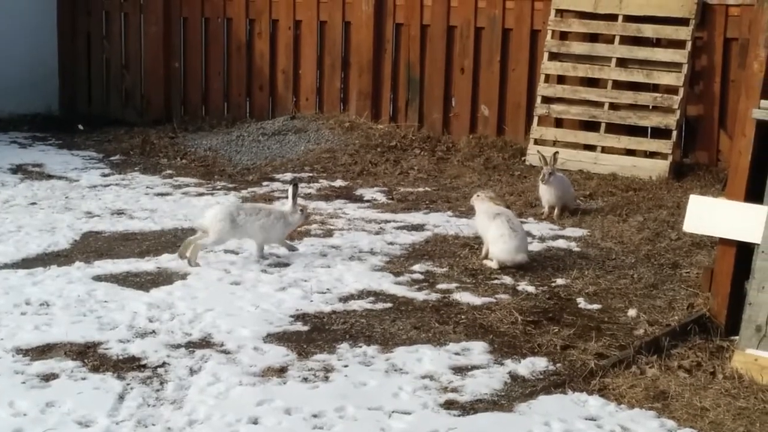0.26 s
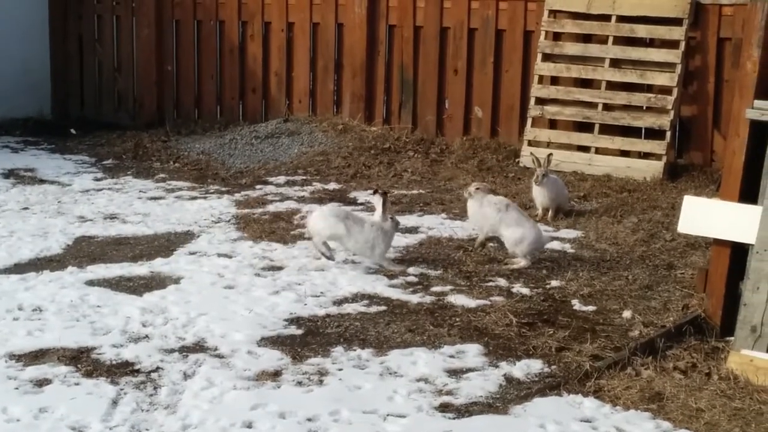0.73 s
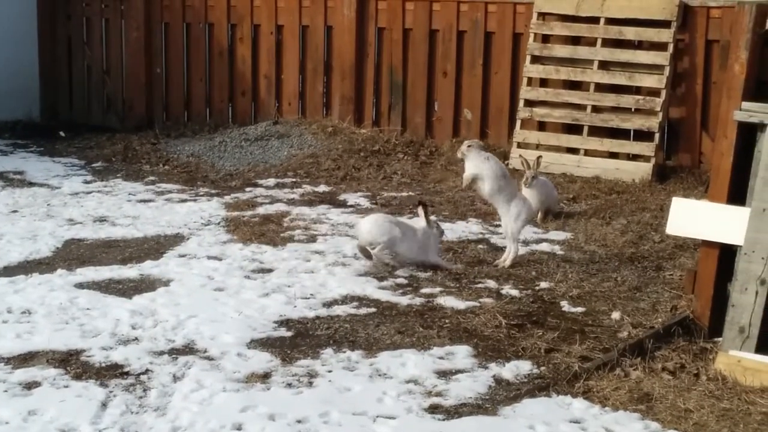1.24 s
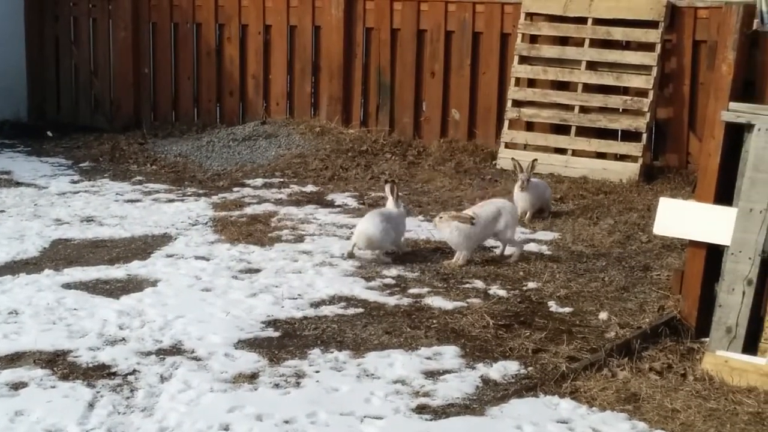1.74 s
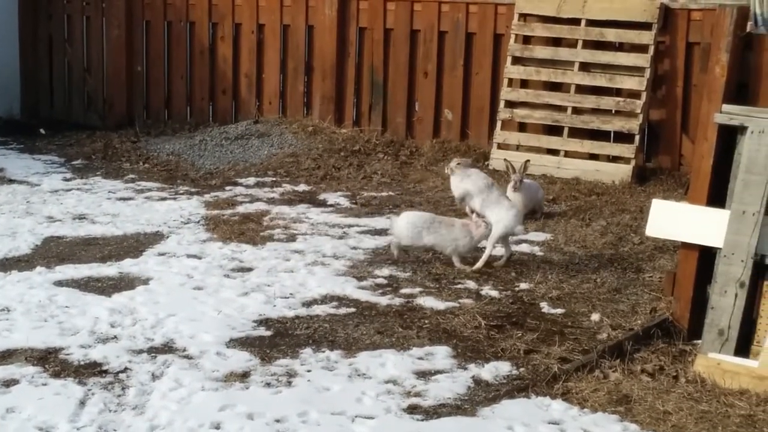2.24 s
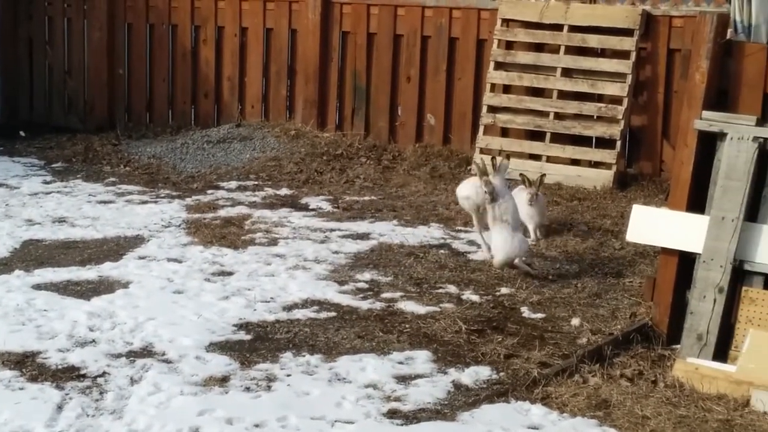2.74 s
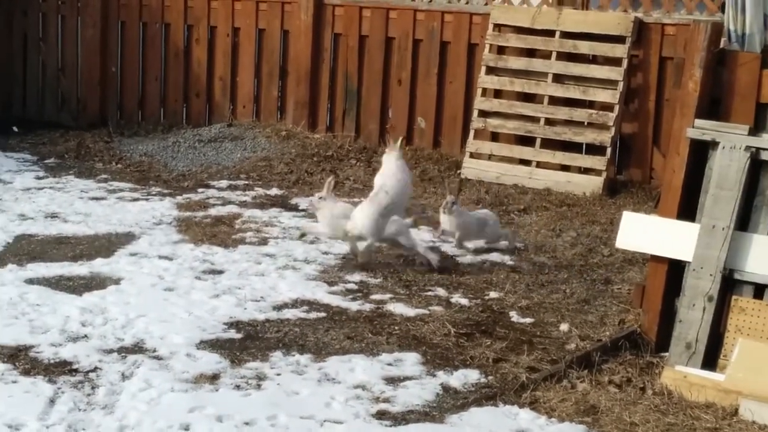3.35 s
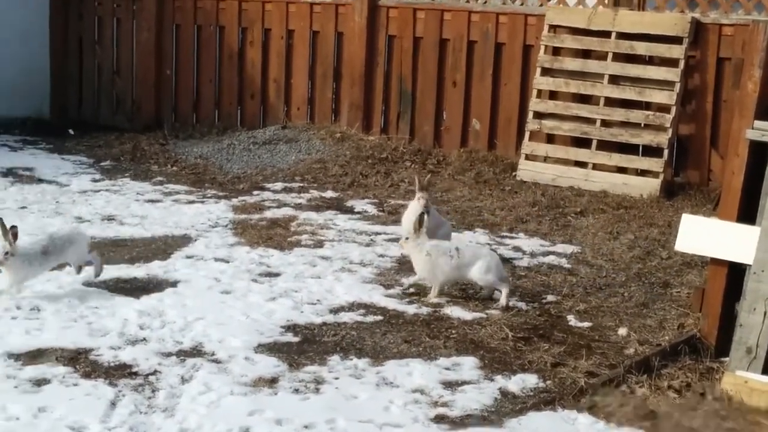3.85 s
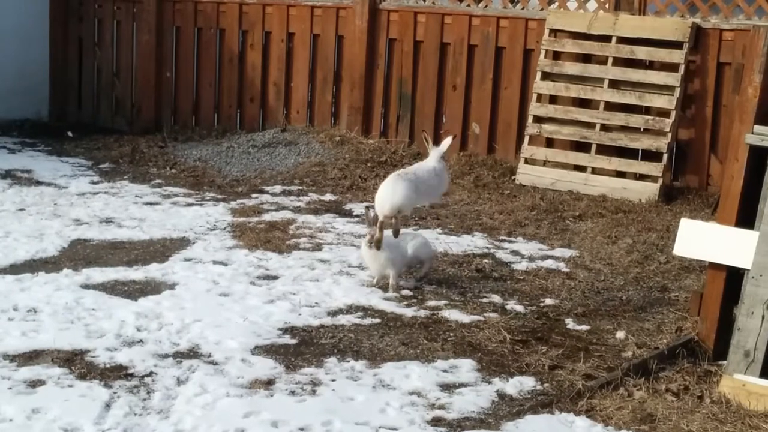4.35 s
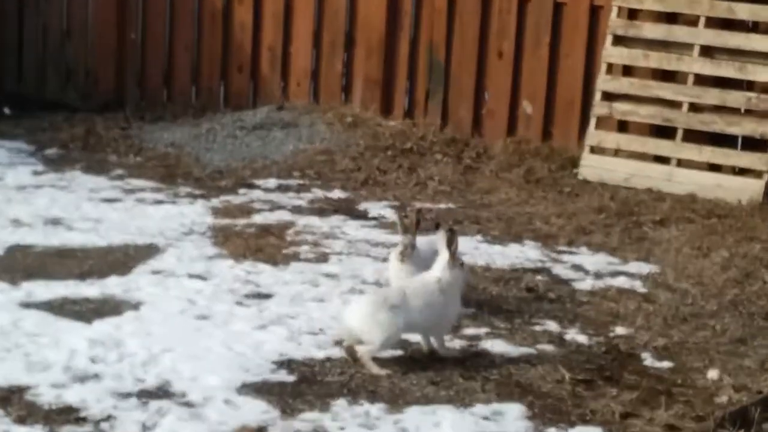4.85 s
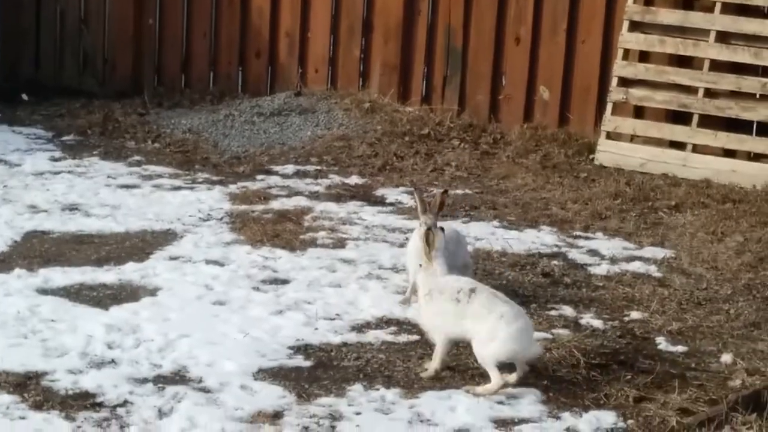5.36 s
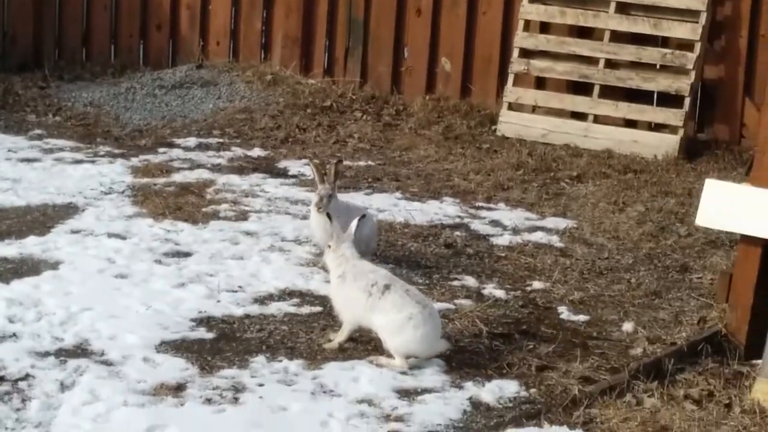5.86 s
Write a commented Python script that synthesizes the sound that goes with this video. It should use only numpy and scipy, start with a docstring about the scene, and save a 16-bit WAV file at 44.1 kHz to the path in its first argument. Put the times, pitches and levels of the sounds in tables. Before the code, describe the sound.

Wild hares fire off quick, gruff, raspy grunts in a close scuffle, with soft paw thuds and dry stalk ticks over quiet outdoor air.

```python
"""Hares grunt as they spar on dry grass and old snow in a fenced yard, over quiet outdoor air (shaped noise).
From the first third of a second come the grunts: a chest tone on the pitch, mostly falling, and a gruff rasp of
uneven pulses and puffs of air in the throat's resonances; the fence echoes and a high hiss follows and lingers
after each one. Later, paws thud (decaying low cycles) and stalks tick (noise bursts). Near the end a faint
squeak slides down (a hoarse sine)."""
import sys
import numpy as np
from scipy import signal
from scipy.fft import rfft, irfft, next_fast_len
from scipy.io import wavfile
from scipy.ndimage import map_coordinates

SR = 44100
rng = np.random.default_rng(int(sys.argv[2]) if len(sys.argv) > 2 else 0)


def waveform_to_disk(signal):
    """Save audio, clipped to [-1, 1], as 16-bit WAV at the path in sys.argv[1]."""
    frames = np.transpose(np.atleast_2d(signal))
    scaled = np.clip(frames, -1, 1) * 32767
    samples = np.round(scaled).astype(np.int16)
    wavfile.write(sys.argv[1], SR, samples)


N = 268657  # length in samples

# noise spectrum of the outdoor air, relative: f/Hz, level per Hz/dB
AIR_SPECTRUM = [(25, -11), (55, 3), (100, 1), (200, -5.5), (400, -9), (800, -5.5), (1300, -15), (2500, -22),
                (5000, -29.5), (10000, -26), (15500, -35)]
# grunts: t/s (attack ends, hold begins), attack/s, hold/s, pitch as the hold begins f/Hz, pitch as it ends f/Hz,
# chest tone level/dB, rasp level/dB, swell over the hold/dB, breathiness/1 (0 to 1),
# then the mouth's posture, its frequencies those of the open mouth at mean pitch: low resonance f/Hz, level/dB,
# middle resonance f/Hz (at 0 dB), upper resonance f/Hz, level/dB, hiss resonance f/Hz, level/dB, treble level/dB
GRUNT_ROWS = [(0.36, 0.05, 0.022, 225.0, 188.4, -43, -50.0, 3, 0.72, 710, 6.5, 2070.0, 2750, 2, 7850, -17, -12),
              (0.407, 0.024, 0.011, 183.0, 179, -45, -54.5, -4, 0.58, 764, 7, 1960, 2900, 0.5, 7400.0, -25.0, -9),
              (0.635, 0.056, 0.0076, 183.0, 184.7, -43.0, -50, 9, 0.91, 780, 2, 2140, 2800, 0.0, 5430, -20, -23),
              (0.662, 0.015, 0.051, 183.0, 173.0, -40.0, -53, 2, 0.42, 750, 7, 1920, 2730, 0.5, 7640, -22, -34),
              (0.867, 0.025, 0.049, 262.0, 182.4, -44, -46, 11.5, 0.78, 700, -8, 1540, 2280, -3.5, 5300, -13.5, 5.5),
              (0.948, 0.042, 0.0081, 177.0, 180, -43, -52, -11.0, 0.7, 780, 3, 1680, 2870, -5, 7600.0, -36, 5),
              (1.117, 0.013, 0.072, 148.0, 165.3, -52, -59, 13.5, 0.69, 590.0, -12, 1650, 3300, -14, 7300.0, -36, -26),
              (1.211, 0.033, 0.093, 174.0, 175.4, -42.0, -47.0, 1, 0.46, 786, -12, 1615, 3250, -8, 7070, -25.5, -16),
              (1.447, 0.019, 0.074, 232.0, 270.2, -41, -33.5, 5, 0.92, 870, -10, 1180, 3020, -0.5, 5440, -10, 11),
              (1.542, 0.024, 0.083, 250.0, 212.3, -42, -34.0, 2.0, 0.88, 1004, 3.0, 1380, 2860, 2, 4870, -1.5, 7),
              (1.674, 0.058, 0.041, 178.0, 167, -44.5, -55.5, -15, 0.6, 865, 1.5, 1650.0, 2710, -0.5, 7400.0, -15, 4.5),
              (1.755, 0.022, 0.064, 310.0, 242.8, -45, -44, -4, 0.89, 865, -16, 1480, 2870, -3.5, 6350, -24, -1),
              (1.896, 0.057, 0.05, 305.0, 250.0, -46.5, -48, -3, 0.84, 890, 7.5, 1180.0, 3030, 1, 7360, -19, -6.5),
              (1.947, 0.016, 0.0092, 226.4, 204.5, -50.5, -45, -7.5, 0.83, 870, 7.5, 1070.0, 3020, 5, 7400, -35, -5),
              (1.993, 0.032, 0.027, 180.0, 150.9, -45.5, -68.5, -16, 1, 630, 18, 1050.0, 2790.0, 5, 7300, -13, 4.0),
              (2.128, 0.022, 0.095, 312.0, 239.2, -44.5, -47.5, -2, 0.87, 517, -9.5, 1450, 2990.0, -6, 5200, -14.5, -12),
              (2.224, 0.03, 0.047, 197.0, 177.0, -45.5, -49, -8, 0.78, 834, -6.5, 1500, 2840, -6.5, 7600.0, -30, -16.5),
              (2.364, 0.022, 0.052, 234.0, 237.5, -47.0, -36.0, 6.5, 0.88, 1240, 1.5, 1450, 2930, 3.5, 6160, -9.5, 4),
              (2.44, 0.07, 0.072, 241.0, 244.3, -35.5, -30, 3.5, 0.45, 1300, 0.0, 1470, 3020, 3.5, 6200, -5.5, 14.5),
              (2.536, 0.0198, 0.044, 214.0, 202.8, -49, -42, 2.5, 0.86, 786, -1.0, 1470.0, 3220, 0, 6400, -8, 8.5),
              (2.609, 0.022, 0.03, 198.0, 205.8, -43.5, -54.5, -3.5, 0.7, 590.0, 13.5, 1480, 2500, -5, 6500.0, -11, 18),
              (2.677, 0.016, 0.0052, 193, 198, -61, -57.5, 9, 1, 614, 11.5, 1860, 2660, 3.5, 7500.0, -15, -2.0),
              (2.748, 0.034, 0.17, 224.2, 224.5, -64, -67, -5, 1, 510, 5.5, 950, 2340.0, 3, 7400.0, -24.0, -28),
              (2.846, 0.028, 0.007, 227.6, 230, -58.5, -42, 6, 0.99, 820.0, -9.0, 1760, 2470, -3.0, 5130, -32, -18),
              (2.867, 0.0066, 0.027, 240.0, 223.3, -41, -36.0, 6, 0.29, 970, -9.5, 1580, 2730, -2, 6240, -8.5, 8.5),
              (2.96, 0.022, 0.014, 184.0, 178.8, -50.5, -53.5, -12, 0.48, 620.0, -6.0, 1440.0, 3190.0, -22, 7440, -19, -1),
              (3.03, 0.012, 0.049, 387.0, 285.4, -44, -41.5, -7.5, 0.93, 535, -8.5, 1400.0, 2370, -7.5, 4270, -20.5, -24),
              (3.098, 0.026, 0.048, 260.0, 228.6, -43.5, -43.5, 9.5, 0.42, 615, 8.5, 1450, 2090.0, 4.0, 7100.0, -17.5, -26),
              (3.263, 0.024, 0.007, 187.0, 187.4, -50, -58, 6, 0.98, 520.0, 12.5, 1277, 3170, 10, 7400.0, -8, -8),
              (3.501, 0.04, 0.069, 315.0, 248.8, -51.0, -49.0, 5, 0.82, 935, -2.5, 1270.0, 2690, -4.5, 7450, -29.5, 5),
              (3.699, 0.028, 0.069, 351.0, 201.2, -47.5, -45.5, -10, 0.91, 825, -4.5, 1330, 2600.0, -3.5, 6470, -21, -2.5),
              (3.79, 0.02, 0.021, 190.0, 165, -55, -72, -3.0, 1, 647, 7.0, 1640.0, 2320, -6, 7500.0, -11, -4),
              (3.917, 0.023, 0.053, 332.0, 257.5, -42.0, -50, -16, 0.93, 563, 1, 1050, 2980, -2.5, 5400.0, -12.5, -1),
              (4.177, 0.015, 0.039, 283.0, 263.2, -50.0, -60, 5, 0.53, 990.0, -1.5, 1870, 2620.0, -3.5, 6940, -24, -3.5),
              (4.234, 0.02, 0.093, 250.0, 212.2, -44.5, -40.5, 4.0, 0.84, 975, -1, 1390, 2610, -2.5, 4370, -19.5, -27),
              (4.354, 0.0096, 0.01, 210.0, 211, -59.5, -51.0, -8, 1, 860.0, -6, 1610.0, 2330.0, 9.0, 7400.0, -28.0, -4),
              (4.441, 0.027, 0.08, 390.0, 251.4, -52.0, -39, -4.5, 0.48, 887, 7, 1630, 2630.0, -3, 5570, -15.5, 1.5),
              (4.511, 0.07, 0.096, 198.0, 191, -48, -43.5, 0, 0.66, 904, 1.5, 1300, 2530, -4.5, 7400, -28.5, -19),
              (4.729, 0.013, 0.069, 367.0, 273.3, -41.0, -42.0, -9.5, 0.83, 530.0, -2, 913, 2800.0, 1.5, 6660, -8, 4),
              (4.812, 0.0202, 0.024, 245.0, 193, -49.0, -64, 10, 1, 480, 13, 960, 2660, -7, 7400.0, -20.5, 4),
              (5.102, 0.018, 0.019, 167.0, 166.7, -53.0, -52.5, 2, 0.3, 995, 4.0, 1460.0, 2730, -7.5, 7330, -43, -38),
              (5.289, 0.016, 0.067, 278.0, 226.7, -49.0, -51.0, -4.5, 0.72, 905, 8.0, 1630, 2710, -4.0, 7330, -32.0, -22),
              (5.377, 0.016, 0.033, 186.0, 162, -48, -54.0, -5.5, 0.85, 840, 8.0, 1810.0, 2630, -5.0, 7470, -29.5, -27),
              (5.593, 0.037, 0.038, 172.0, 161.3, -49.5, -59.5, -1.5, 0.73, 602, 4.5, 1770, 2310, -3, 7100.0, -18.5, -15)]
# what the throat lets through between its resonances: f/Hz, level/dB
THROAT_VALLEYS = [(100, -21.5), (300, -17.5), (500, -30), (1000, -24.5), (2000, -8.5), (3500, -25),
                  (4500, -34.5), (8000, -32), (11000, -41.5), (15500, -45.5)]
# resonances of the snout, alike in every posture: f/Hz, width/Hz, level/dB
SNOUT_RESONANCES = [(373, 47, -11.5), (2076, 122, -8), (3420, 290, -11.5), (7450, 2000, -30)]
# paws landing: t/s, level/dB (before the common thud trim)
PAW_THUDS = [(1.396, -46), (1.798, -41), (1.871, -45), (1.933, -39.5), (2.03, -41.5), (2.155, -37.5),
             (2.378, -50), (3.742, -51), (3.885, -46.5)]
# dry stalks snapping under a paw: t/s, level/dB (before the common snap trim)
STALK_SNAPS = [(1.9344, -58), (2.932, -46), (3.5169, -56), (3.6436, -49.5), (3.657, -56), (4.0118, -59),
               (5.512, -59.5)]

AIR_DB = -69.5  # rms level of the air
LEAD_S, TAIL_S = 0.06, 0.09  # time computed before and after the hold
# the level climbs this far per attack time, then falls at a fixed rate after the hold
ATTACK_DB, CHEST_ATTACK_DB = 29.5, 24.5
RASP_DECAY_DB_PER_S, CHEST_DECAY_DB_PER_S = 600.5, 564
# the chest tone lags the rasp, outlasts it and takes only a share of its swell
CHEST_LAG_S, CHEST_LINGER_S, CHEST_SWELL_SHARE = 0.0035, 0.003, 0.16
GLIDE_ON_S = 0.033  # the pitch glides on this long past the hold
# half-widths of the four resonances set by the posture
LOW_WIDTH_HZ, MIDDLE_WIDTH_HZ, UPPER_WIDTH_HZ, HISS_WIDTH_HZ = 164, 282, 432, 380
TREBLE_HZ = 4050  # the posture's treble level acts above this
# the mouth opens as the hold begins: resonances slide up by the share MOUTH_SHUT, then follow the pitch a little
MOUTH_SHUT, MOUTH_OPENING_S, MOUTH_FOLLOWS_PITCH = 0.1, 0.008, 0.08
RASP_BAND_HZ = (600, 4000)  # where the rasp is brought to an rms of one
BAND_LIMIT_HZ = 15680


def amp(db):
    """Level to amplitude: 20 dB is a factor of ten."""
    return 10 ** (np.asarray(db) / 20)


def unit(x):
    """Normalisation to an rms of one."""
    return x / np.sqrt(np.mean(x ** 2) + 1e-20)


def read(points, hz):
    """Spectrum in dB by linear interpolation over log frequency."""
    f, db = np.transpose(points)
    return np.interp(np.log(hz + 1), np.log(f), db)


def add(mix, s, sound):
    """Superposition: adds a sound into the mix at time s."""
    part = mix[round(s * SR):][:len(sound)]
    part += sound[:len(part)]


def band(x, low_hz, high_hz, order=3):
    """Band-pass filtering with a flat (Butterworth) passband."""
    sos = signal.butter(order, [low_hz, min(high_hz, SR / 2 - 1)], "band", fs=SR, output="sos")
    return signal.sosfilt(sos, x)


def wander(size, rate_hz):
    """Random modulation: low-passed noise of rms one, varying mostly slower than rate_hz."""
    padded = next_fast_len(size + SR // 10, real=True)
    hz = np.fft.rfftfreq(padded, 1 / SR)
    low_pass = 1 / (1 + (hz / rate_hz) ** 2) ** 2
    return unit(irfft(rfft(rng.standard_normal(padded)) * low_pass, padded))[:size]


def air(wash_swell_db=1, rumble_swell_db=3.0, split_hz=200):
    """Spectrally shaped noise: a slowly varying wash over a lumpy low rumble."""
    hz = np.fft.rfftfreq(N, 1 / SR)
    spectrum = rfft(rng.standard_normal(N)) * amp(read(AIR_SPECTRUM, hz))
    low_share = 1 / (1 + (hz / split_hz) ** 2)
    rumble = irfft(spectrum * low_share, N) * amp(rumble_swell_db * wander(N, 24))
    wash = irfft(spectrum * (1 - low_share), N) * amp(wash_swell_db * wander(N, 3))
    return amp(AIR_DB) * unit(rumble + wash)


def envelope(t, hold, swell_db, rise, fall, stop_db=3, stop_s=0.018):
    """Exponential growth and decay, linear in dB (rise, fall in dB/s), with a step down as the push stops."""
    after = np.maximum(t - hold, 0)
    stopped = 1 - 1 / (1 + (after / stop_s) ** 4)
    swell = swell_db * (np.clip(t / hold, 0, 1) - 0.5)
    return swell + rise * np.minimum(t, 0) - fall * after - stop_db * stopped


def folds(turns, breathiness, jitter=0.012, shimmer_db=1.27, leak=0.7):
    """Pulsed excitation: each cycle the folds snap shut, early or late, with a puff of air; slack folds leak."""
    uneven = turns + jitter * wander(len(turns), 300)  # jitter in cycles
    cycle = np.floor(np.maximum.accumulate(uneven))
    snaps = np.diff(cycle, prepend=cycle[0])
    puff_shape = np.exp(-(uneven % 1) / 0.25)  # dies away over a quarter of a cycle
    airflow = 0.18 + leak * breathiness ** 6 + puff_shape
    puffs = airflow * rng.standard_normal(len(turns))
    drive = np.sqrt(1 - breathiness) * unit(snaps) + np.sqrt(breathiness) * unit(puffs)
    return drive * amp(shimmer_db * wander(len(turns), 65))


def resonance(hz, centre, width, db):
    """Power response of one steep resonance: a squared Lorentzian."""
    return (amp(db) / (1 + ((abs(hz) - centre) / width) ** 2)) ** 2


def throat(drive, posture, size=2048, smear_s=0.0007, pocket_hz=2400):
    """Source-filter principle: resonances ring minimum-phase; snout pockets delay some bands and smear pulses."""
    low_hz, low_db, middle_hz, upper_hz, upper_db, hiss_hz, hiss_db, treble_db = posture
    hz = np.fft.fftfreq(size, 1 / SR)
    power = amp(read(THROAT_VALLEYS, abs(hz))) ** 2
    power += resonance(hz, low_hz, LOW_WIDTH_HZ, low_db)
    power += resonance(hz, middle_hz, MIDDLE_WIDTH_HZ, 0)
    power += resonance(hz, upper_hz, UPPER_WIDTH_HZ, upper_db)
    power += sum(resonance(hz, *row) for row in SNOUT_RESONANCES)
    treble = 1 - 1 / (1 + (hz / TREBLE_HZ) ** 16)
    power = power * amp(treble_db * treble) ** 2
    power += resonance(hz, hiss_hz, HISS_WIDTH_HZ, hiss_db)
    # the Hilbert transform of the log magnitude gives the minimum phase
    causal = np.exp(np.conj(signal.hilbert(np.log(power) / 2)))
    # phase lag whose delay swings between 0 and 2 * smear_s along the frequency axis
    lag = smear_s * (2 * np.pi * hz + pocket_hz * np.sin(2 * np.pi * hz / pocket_hz))
    ring = np.fft.ifft(causal * np.exp(-1j * lag)).real
    return signal.fftconvolve(drive, ring[:size // 2])[:len(drive)]


def rasp_voice(turns, breathiness, posture, mouth):
    """Frequency scaling by time warp: the folds ring the throat, whose whole response scales with the mouth curve."""
    clock = np.cumsum(mouth)
    # the inverse warp of the turns keeps the pitch as it was
    warped_turns = np.interp(np.arange(int(clock[-1]) + 2), clock, turns)
    rung = throat(folds(warped_turns, breathiness), posture)
    voice = band(map_coordinates(rung, [clock], order=3), 185, 20000)
    return voice / np.std(band(voice, *RASP_BAND_HZ))


def chest_tone(turns, breathiness, hoarse=0.64, hoarse_hz=110, octave_db=-22, flutter_db=-19):
    """Narrow-band modulation: a clean fundamental if tight, a hoarse band around the pitch if loose."""
    size = len(turns)
    share = np.clip(hoarse * breathiness ** 2, 0, 1)
    blur = (wander(size, hoarse_hz) + 1j * wander(size, hoarse_hz)) / np.sqrt(2)
    turn = np.exp(2j * np.pi * turns)
    tone = (np.sqrt(1 - share) + np.sqrt(share) * blur) * turn + amp(octave_db) * turn ** 2
    # unequal cycles leave a low flutter under the tone
    flutter = unit(band(rng.standard_normal(size), 46, 160, order=2))
    return amp(flutter_db) * flutter - unit(tone.real)


def grunt(row, waver=0.02, bright_hz=4200, brighten=0.28, bright_db_per_octave=14,
          treble_db=-2.12, tremble_db=0.01, tremble_hz=45):
    """Phonation: a chest tone on the pitch plus the throat's rasp on the same phase; returns start time and sound."""
    (hold_start, attack, hold, first_hz, last_hz,
     chest_level, rasp_level, swell, breathiness, *posture) = row
    breathiness = np.clip(breathiness, 0, 1)
    t = np.arange(-LEAD_S, hold + TAIL_S, 1 / SR)

    pitch = first_hz * (last_hz / first_hz) ** (np.clip(t, 0, hold + GLIDE_ON_S) / hold)
    turns = np.cumsum(pitch * (1 + waver * wander(len(t), 90))) / SR
    tension = pitch / np.sqrt(first_hz * last_hz)
    opening = 1 - MOUTH_SHUT * (1 - np.tanh(t / MOUTH_OPENING_S)) / 2
    mouth = opening * tension ** MOUTH_FOLLOWS_PITCH

    rasp_db = rasp_level + envelope(t, hold, swell, ATTACK_DB / attack, RASP_DECAY_DB_PER_S)
    chest_db = chest_level + envelope(t - CHEST_LAG_S, hold + CHEST_LINGER_S, CHEST_SWELL_SHARE * swell,
                                      CHEST_ATTACK_DB / attack, CHEST_DECAY_DB_PER_S)

    voice = rasp_voice(turns, breathiness, posture, mouth)
    # the treble fades faster than the rest as the effort slackens and the pitch sinks
    mellow = signal.sosfiltfilt(signal.butter(2, bright_hz, fs=SR, output="sos"), voice)
    slack_db = brighten * (rasp_db - rasp_db.max()) + bright_db_per_octave * np.log2(tension)
    voice = mellow + (voice - mellow) * amp(treble_db + slack_db)

    tremble = amp(tremble_db * wander(len(t), tremble_hz))
    sound = amp(chest_db) * chest_tone(turns, breathiness) + amp(rasp_db) * voice
    return hold_start - LEAD_S, tremble * sound


def lingering_hiss(voices, level_db=-82, linger_s=0.09, follow=0.4, grain_db=3):
    """Envelope following: a fine high hiss swells with each grunt and lingers after it."""
    keep = np.exp(-1 / (linger_s * SR))
    effort = signal.lfilter([1 - keep], [1, -keep], abs(voices) ** follow)
    grains = rng.standard_normal(N) * amp(grain_db * wander(N, 400))
    return amp(level_db) * unit(effort * band(grains, 4700, 17000, order=2))


def yard(x, fence_s=0.025, fence_db=-26, tail_db=-30, t60=0.17):
    """Reflection and reverberation: a weak slap from the fence, then the yard's short, thin tail."""
    t = np.arange(SR // 2) / SR
    tail = band(rng.standard_normal(len(t)), 120, 9000, order=1) * amp(-60 * t / t60) * (t > fence_s)
    echo = amp(tail_db) * tail / np.linalg.norm(tail)
    echo[round(fence_s * SR)] += amp(fence_db)
    return signal.fftconvolve(x, echo)[:N]


def paws(thud_hz=72, thud_s=0.0078, thud_trim_db=-2, snap_s=0.0031, snap_trim_db=-9):
    """Damped impact: soft ground gives a few low cycles under a landing; stalks give a short noise tick."""
    out = np.zeros(N)
    t = np.arange(SR // 5) / SR
    for s, db in PAW_THUDS:
        push = t / thud_s * np.exp(1 - t / thud_s)  # peaks at one after thud_s
        cycles = np.sin(2 * np.pi * thud_hz * rng.uniform(1.0, 1.05) * t)
        add(out, s, amp(db + thud_trim_db) * push * cycles)
    for s, db in STALK_SNAPS:
        crackle = unit(band(rng.standard_normal(len(t)), 3900, 13000, order=1))
        add(out, s, amp(db + snap_trim_db) * crackle * np.exp(-t / snap_s))
    return out


def squeak(start=5.9, length=0.098, from_hz=3300, to_hz=2100, level_db=-69, blur_hz=750):
    """Frequency glide: a faint whistle, hoarse by random modulation, slides down, perhaps a far bird."""
    size = round(length * SR)
    turns = np.cumsum(np.geomspace(from_hz, to_hz, size)) / SR
    whistle = np.hanning(size) * wander(size, blur_hz) * np.sin(2 * np.pi * turns)
    out = np.zeros(N)
    add(out, start, amp(level_db) * whistle)
    return out


def scene():
    """Superposition of air, hares, footwork and squeak, with the yard's echo of all but air and the lingering
    hiss."""
    voices = np.zeros(N)
    for row in GRUNT_ROWS:
        add(voices, *grunt(row))
    direct = voices + paws() + squeak()
    return (direct + yard(direct) + lingering_hiss(voices) + air())[None]


def record(dry):
    """Linear filtering: the microphone's bass roll-off and the recorder's band limit."""
    dry = signal.sosfilt(signal.butter(2, 38, "high", fs=SR, output="sos"), dry)
    low_pass = signal.firwin(511, BAND_LIMIT_HZ, window=("kaiser", 9), fs=SR)
    return signal.oaconvolve(dry, low_pass[None], "same")


dry = scene()
out = record(dry)
waveform_to_disk(out)
```